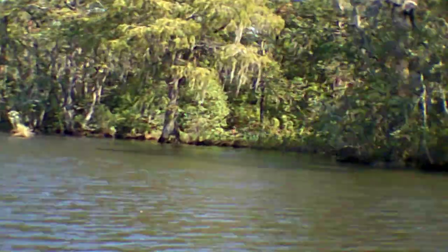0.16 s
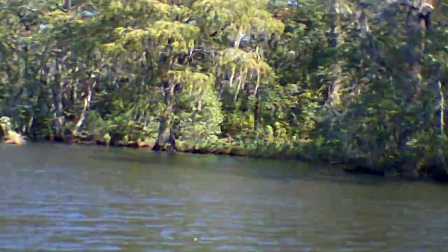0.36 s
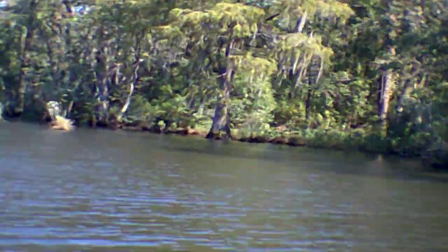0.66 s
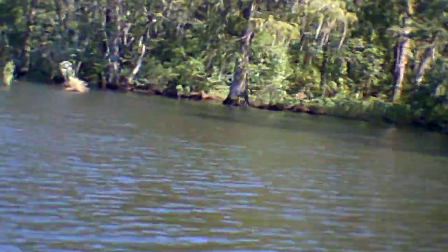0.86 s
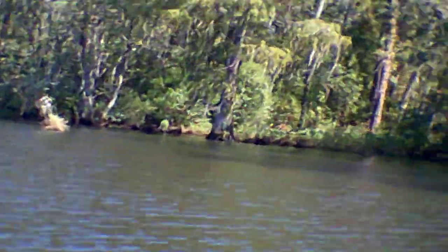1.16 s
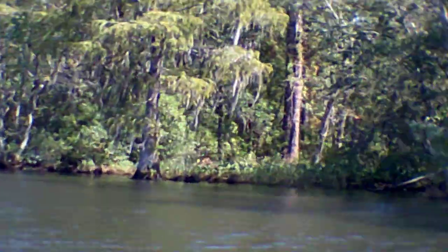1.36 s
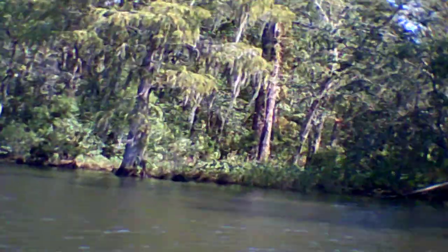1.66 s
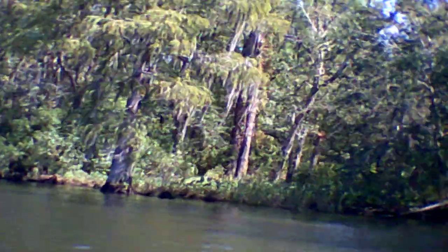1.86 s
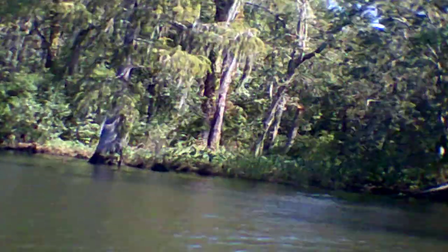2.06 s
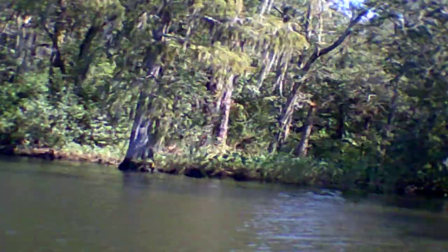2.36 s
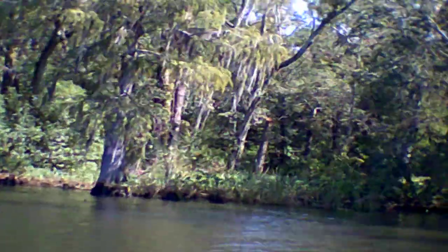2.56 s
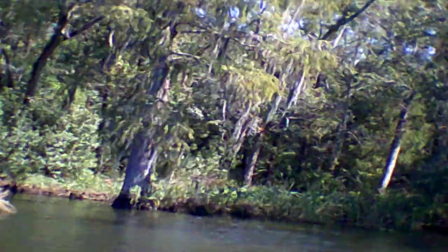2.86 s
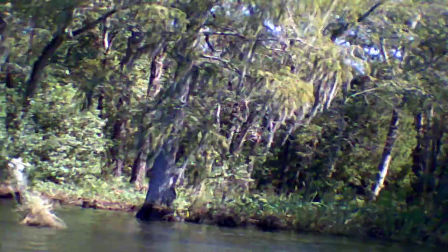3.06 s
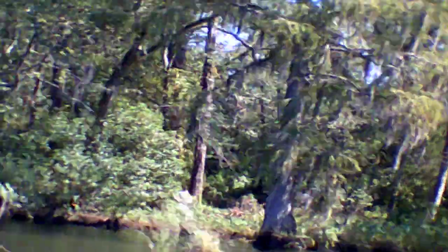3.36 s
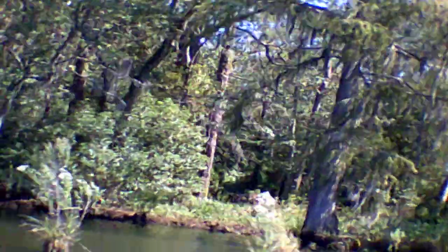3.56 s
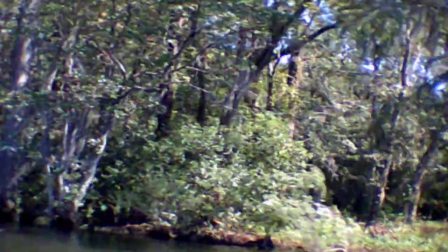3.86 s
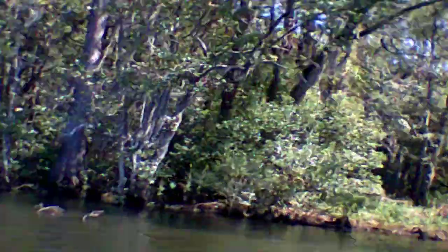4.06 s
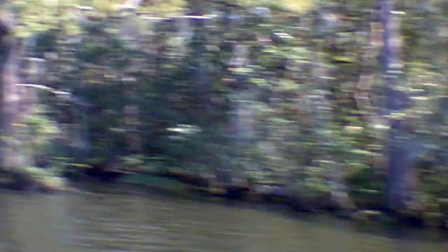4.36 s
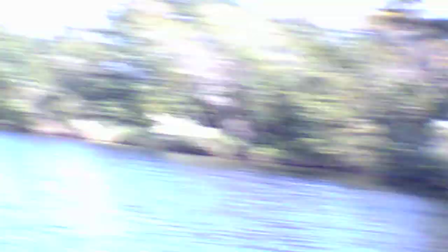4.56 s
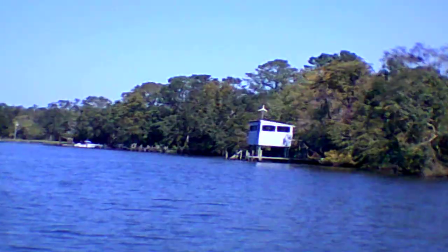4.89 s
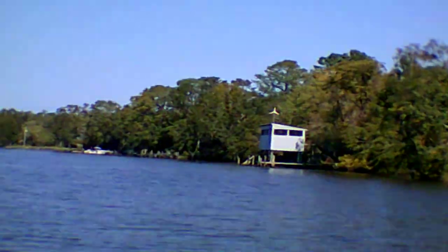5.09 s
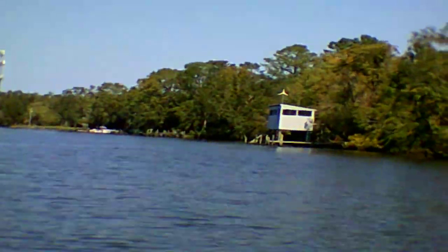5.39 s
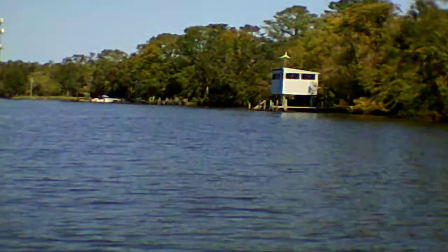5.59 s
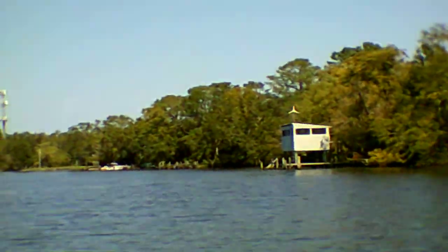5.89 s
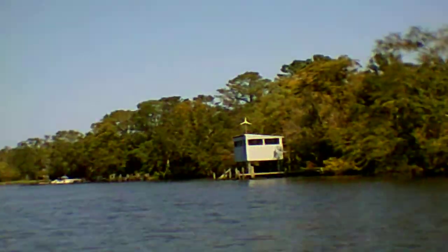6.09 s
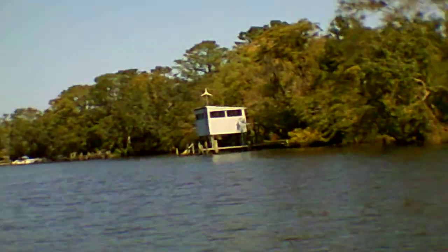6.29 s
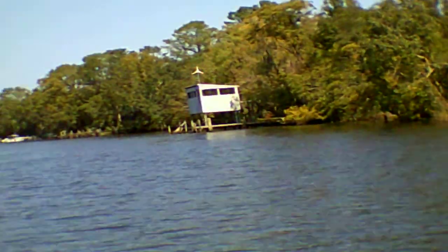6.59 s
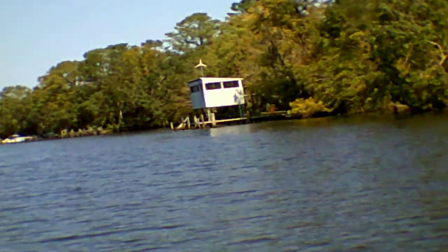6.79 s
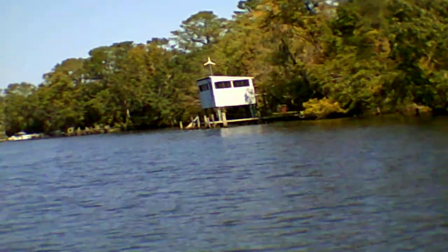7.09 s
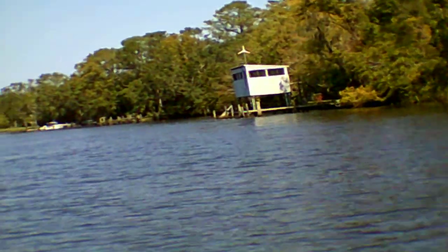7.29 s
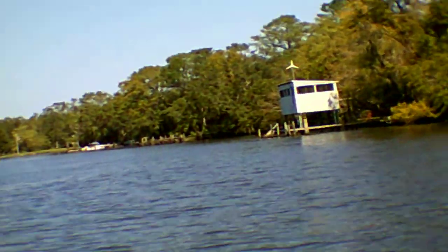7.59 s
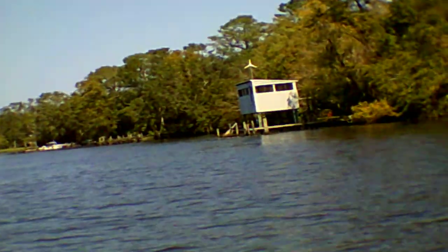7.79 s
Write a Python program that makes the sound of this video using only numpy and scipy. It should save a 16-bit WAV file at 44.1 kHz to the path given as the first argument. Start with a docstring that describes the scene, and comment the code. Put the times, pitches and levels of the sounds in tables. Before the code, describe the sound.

Outdoors on a river, a two-cylinder two-stroke watercraft engine runs very close to a single overloaded microphone, so the sound is dense, flat and harshly distorted throughout. It starts at a medium buzzing drone, around 150 firings a second, with nasal bark, wet gurgle and faint spray hiss. At 0.5 s it sags, reaching a low growl near 0.65, then surges to a high, full rev from 1.2 to 1.65 s and falls to a stumbling low by 2.05. Tiny bright water slaps strike at 1.5 and 2.1 s. From 2.3 to 5.1 it hovers at medium revs, dipping briefly near 2.9 and 3.55, while low wind thumps swell unevenly. It drops at 5.3, surges high around 5.9-6.2, falls at 6.5, then resumes the medium drone, dipping at 7.2 and continuing until the end near 8 s.

```python
"""A two-cylinder two-stroke watercraft engine beside the microphone, its speed following the throttle.
From the start shaft orders hum through the hull, firings bark, wet gas gurgles, spray hisses and wind buffets.
The revs dip, surge by 1.3 s and fall by 2 s; bright water slaps the hull at 1.5 and 2.1 s.
The speed then hovers near 75 turns a second, dips and surges again at 5.3-6.2 s, falls and steadies with dips.
Coloured noise, cosines and resonated pulses make the sources; their sum is clipped hard throughout."""
import sys
import numpy as np
from scipy.fft import rfft, irfft, next_fast_len
from scipy.io import wavfile
from scipy.ndimage import uniform_filter1d, map_coordinates

SR = 44100
rng = np.random.default_rng(int(sys.argv[2]) if len(sys.argv) > 2 else 0)


def unload_wav(signal):
    """Save mono or channel-first audio to the path in sys.argv[1] as 16-bit WAV at rate SR, clipped to [-1, 1]."""
    wavfile.write(
        sys.argv[1],
        SR,
        np.round(np.clip(np.atleast_2d(signal).T, -1, 1) * 32767).astype(np.int16),
    )


N = 350154


def amp(db):
    """Decibel law: amplitude ratio of a level in dB."""
    return 10 ** (np.asarray(db) / 20)


def unit(x):
    """Normalisation to an rms of 1."""
    return x / np.sqrt(np.mean(x ** 2) + 1e-20)


def curves(rows):
    """Linear interpolation in time: one value per sample for each column after the time."""
    s, *columns = np.transpose(rows)
    return [np.interp(np.arange(N) / SR, s, column) for column in columns]


def wobble(rate):
    """Band-limited random modulation: a smooth curve through `rate` random knots a second."""
    knots = rng.standard_normal(int(N * rate / SR) + 4)
    return map_coordinates(knots, [np.arange(N) * rate / SR])


def along(points, hz, closed=True):
    """Gain interpolated in dB on a log frequency axis; above the last point -120 dB if closed, else held."""
    f, db = np.transpose(points)
    above_db = -120 if closed else db[-1]
    return amp(np.interp(np.log(hz + 1), np.log(f + 1), db, db[0], above_db))


def filtered(x, response):
    """Linear filtering: the spectrum of x times a complex response of frequency."""
    m = next_fast_len(N + SR // 2)
    hz = np.fft.rfftfreq(m, 1 / SR)
    return irfft(rfft(x, m) * response(hz), m)[..., :N]


def noise(spectrum):
    """Spectral shaping of white noise, at rms 1."""
    return unit(filtered(rng.standard_normal(N), lambda hz: along(spectrum, hz)))


COAST_HZ_PER_S = 70  # rate of speed change that counts as fully coasting or pulling
COAST_DB = -7  # change of the bark and of orders above the third at full coasting


def throttle(shaft_hz):
    """Angular acceleration: -1 coasting down, 0 at steady speed, 1 pulling up."""
    hz_per_s = uniform_filter1d(np.gradient(shaft_hz) * SR, size=SR // 20)
    return np.clip(hz_per_s / COAST_HZ_PER_S, -1, 1)


def coasting_db(pull):
    """Load dependence of the exhaust note: it weakens as the engine coasts."""
    return COAST_DB * np.maximum(-pull, 0)


# Strength of each shaft order against speed: (shaft speed [Hz], levels of orders 1 to 8 [dB], eight columns)
ORDER_LEVELS = [(50.3, -16.5, -14.5, -22, -11, -18, -17, -21.5, -21.5),
                (56.7, -17, -14.5, -12, -13, -21.5, -18, -29.5, -25),
                (63.3, -16, -14, -11.5, -22.5, -28, -22, -31, -11),
                (69.45, -19, -13, -9, -18, -20.5, -17.5, -33, -18),
                (75.38, -28, -7, -18.5, -15, -18.5, -28.5, -20, -34),
                (87.6, -18, -8.5, -13, -19, -18, -10.5, -26, -19),
                (95, -19, -9, -11.5, -15.5, -27, -19.5, -13.5, -30),
                (107.6, -12.5, -7.5, -16.5, -12, -21, -21.5, -30.5, -26)]
# Transmission of the hum through the hull: (frequency [Hz], gain [dB])
HULL_GAIN = [(50, -2.5), (105, 4.5), (150, 2), (220, 2.5), (300, 4.5), (375, 5), (440, 2.5), (530, -1),
             (650, -2), (900, -7.5)]
# Slow lift of the fourth order: (time [s], gain [dB])
FOURTH_LIFT = [(0, 2.5), (1.3, -1), (2.5, 0), (4.5, 1), (5.6, -1.5), (6.1, -0.5), (6.8, 0.5), (7.2, 0),
               (7.5, 2), (7.94, 4.5)]
FIRING, THIRD, FOURTH = 2, 3, 4  # shaft orders; two firings a turn
TRAIL_TURNS = 0.01089  # phase lag of an order, in its own cycles, per order squared
ODD_DRIFT_TURNS = 0.1977  # slow slip of the odd orders against the firing, in their own cycles
STUMBLE_TURNS = 0.03  # crank unsteadiness at full coasting
THIRD_GAIN_DB = 12  # third order per unit of imbalance
FLUTTER_DB, STUMBLE_DB = 0.66, 4  # level drift of each order, and its increase at full coasting


def hum(turns, shaft_hz, imbalance, firing_db, pull):
    """Harmonic synthesis: cosines at multiples of the shaft speed, lagging as the square of their order."""
    speed, *levels_db = np.transpose(ORDER_LEVELS)
    lift_db, = curves(FOURTH_LIFT)
    coast = np.maximum(-pull, 0)
    flutter_db = FLUTTER_DB + STUMBLE_DB * coast
    stumble = STUMBLE_TURNS * coast * wobble(25)
    tones = 0
    for order, order_db in enumerate(levels_db, 1):
        jitter = 0.0088 * wobble(5) + 0.0066 * wobble(45) + stumble
        phase = order * (turns + jitter) - TRAIL_TURNS * order ** 2
        if order % FIRING:
            phase = phase + ODD_DRIFT_TURNS * wobble(2.5)

        level_db = np.interp(shaft_hz, speed, order_db)
        if order == FIRING:
            level_db = level_db + firing_db
        elif order == THIRD:
            level_db = level_db + THIRD_GAIN_DB * (imbalance - 0.3)
        elif order > THIRD:
            level_db = level_db + coasting_db(pull)
        if order == FOURTH:
            level_db = level_db + lift_db
        level_db = level_db + flutter_db * wobble(14) + wobble(30)

        level = np.sqrt(2) * amp(level_db) * along(HULL_GAIN, order * shaft_hz)
        tones = tones + level * np.cos(2 * np.pi * phase)
    return tones


# Exhaust pipe resonances: (centre frequency [Hz], bandwidth [Hz], gain [dB])
PIPE_MODES = [(525.5, 63, 7), (773, 470, -1.5), (1070, 430, -13), (1880, 110, -18.5)]
# Bark against engine speed: (shaft speed [Hz], level [dB])
BARK_LEVEL = [(48, -32.5), (65, -27.5), (75, -22.5), (108, -22)]


def pipe(f):
    """Modal superposition: resonances of alternating sign, between a bass and a treble roll-off."""
    modes = 0
    for k, (centre, width, db) in enumerate(PIPE_MODES):
        resonance = 1j * f * width / (centre ** 2 - f ** 2 + 1j * f * width)
        modes = modes + (-1) ** k * amp(db) * resonance
    bass_cut = f ** 2 / (f ** 2 + 500 ** 2)
    return modes * bass_cut / (1 + (f / 2800) ** 4)


def bark(turns, shaft_hz, imbalance, pull):
    """Impulse excitation of a resonator: two firings a turn, the second weaker and later with imbalance."""
    count = int(2 * turns[-1])
    scatter_turns, scatter_db = (rng.standard_normal((count, 2)) * [0.011, 2.5]).T
    slot = np.arange(count) / 2  # firing angle in turns
    second = np.arange(count) % 2 * np.clip(np.interp(slot, turns, imbalance), 0, 1)
    angle = slot + 0.1645 + 0.11 * second + scatter_turns
    at = np.interp(angle, turns, np.arange(N)).astype(int)
    blows = np.bincount(at, amp(-8 * second + scatter_db), N)
    level = amp(coasting_db(pull)) * along(BARK_LEVEL, shaft_hz, closed=False)
    return level * unit(filtered(blows, pipe))


# Spectrum of gas in the cooling water: (frequency [Hz], density level [dB])
GURGLE_SPECTRUM = [(40, -16.5), (100, 2), (220, 4.5), (500, -4), (1000, -9.5), (2000, -38.5), (3000, -36),
                   (5000, -85), (7900, -48.5), (8700, -83.5)]
# Gurgle against engine speed: (shaft speed [Hz], level [dB])
GURGLE_LEVEL = [(48, -14), (63, -11), (75, -14.5), (108, -14)]


def gurgle(turns, shaft_hz):
    """Amplitude modulation: gas tearing through the cooling water is noise puffed once a firing."""
    puff = 1 + 0.21 * np.cos(2 * np.pi * FIRING * turns + 1.33)
    lumps = amp(1.2 * wobble(25))
    return along(GURGLE_LEVEL, shaft_hz, closed=False) * unit(puff * lumps * noise(GURGLE_SPECTRUM))


# Spectrum of the jet's spray: (frequency [Hz], density level [dB])
SPRAY_SPECTRUM = [(300, -71.5), (700, -31.5), (1300, 3), (2200, -0.5), (2600, -14), (4000, -24),
                  (6000, -32.5), (7900, -24), (8700, -60)]


def spray(shaft_hz):
    """Flow noise as a power law of speed: the jet's hiss gains 5.9 dB per doubling."""
    return amp(-26.5 + 5.9 * np.log2(shaft_hz / 75)) * noise(SPRAY_SPECTRUM)


# Engine speed: (time [s], shaft speed [Hz])
SHAFT_SPEED = [(0.0, 74.5), (0.42, 75.87), (0.49, 69.8), (0.62, 50.26), (0.66, 46.97), (0.82, 63.23),
               (0.97, 81.45), (1.08, 95.36), (1.22, 107.5), (1.3, 109.7), (1.64, 107.5), (1.72, 98.72),
               (1.85, 70.62), (1.94, 56.82), (2.05, 52.48), (2.12, 59), (2.28, 70.83), (2.34, 75.96),
               (2.45, 77.9), (2.5, 75.2), (2.7, 76.1), (2.9, 68.14), (3.03, 75.1), (3.25, 77.2),
               (3.36, 75.62), (3.54, 66.7), (3.67, 74.23), (3.89, 74.7), (4.02, 73.95), (4.14, 72.4),
               (4.29, 76.2), (4.33, 74.07), (4.64, 75.96), (4.75, 74.8), (4.8, 71.33), (5.02, 76.7),
               (5.08, 76.17), (5.15, 69.3), (5.29, 48.28), (5.48, 67.67), (5.79, 102.8), (5.93, 109.2),
               (6.19, 108.7), (6.37, 72), (6.5, 55.82), (6.74, 75.66), (6.88, 77.37), (7.01, 75.54),
               (7.21, 62.33), (7.43, 75.16), (7.61, 74.3), (7.74, 75.44), (7.94, 72.9)]
# Engine loading: (time [s], gain of hum, bark and gurgle [dB], cylinder imbalance [0-1], firing order gain [dB])
ENGINE_LOAD = [(0.0, 1.5, 0, 2), (0.44, -1, 0.1, 1.5), (0.57, -3, 0.6, 0.5), (0.66, 1, 0.6, 2),
               (0.79, 1.5, .4, 3), (0.97, 5.5, .3, -1), (1.37, 1.5, .3, 0), (1.64, 6.5, .3, -2),
               (1.69, 6, 0, -10.5), (1.76, 3.5, 0, 1), (1.87, 3, 0.1, -8), (2.03, 2, 0.5, -3),
               (2.32, 3, .4, 0.5), (2.6, 2.5, .3, 0), (2.81, 4, 0.2, -0.5), (3.1, 1, 0, 2.5),
               (3.5, 2.5, .3, 1), (3.7, 3.5, 0, 2), (4.1, 3.5, .5, -1), (4.3, 3.5, .2, 2),
               (4.69, 4, .2, -0.5), (5.05, 3, 0.2, 0.5), (5.22, -1.5, .4, -4), (5.32, 1.5, .3, 3),
               (5.45, 3.5, 0.23, 0), (6.19, 5, .4, 0.5), (6.27, 5, 0.4, -5.5), (6.43, 3.5, 0, -2.5),
               (6.81, 5, 0.6, -3), (7.08, 3.5, 0, -1), (7.4, 3.5, 0.71, -2), (7.7, 2.5, 0.7, -3),
               (7.94, 2.5, .3, -1.5)]


def engine():
    """Phase coherence: hum, bark and gurgle share one crank angle, the integral of shaft speed."""
    shaft_hz, = curves(SHAFT_SPEED)
    loud_db, imbalance, firing_db = curves(ENGINE_LOAD)
    turns = np.cumsum(shaft_hz) / SR
    pull = throttle(shaft_hz)
    body = hum(turns, shaft_hz, imbalance, firing_db, pull)
    body = body + bark(turns, shaft_hz, imbalance, pull)
    body = body + gurgle(turns, shaft_hz)
    return amp(loud_db) * body + spray(shaft_hz)


# Strength of the buffeting: (time [s], level [dB])
BUFFET_LEVEL = [(0.0, -15.5), (0.25, -14), (0.55, -15.5), (0.7, -8.5), (0.8, -18.5), (1.15, -23),
                (1.41, -2), (1.6, -4), (1.85, -3.5), (2.1, -0.5), (2.3, -14), (2.55, -6), (3.0, -7.5),
                (3.25, -18.5), (3.45, -1.5), (3.9, -6), (4.2, -3.5), (4.45, -4), (4.9, -13), (5.28, -12.5),
                (5.5, -17), (5.95, -19), (6.4, -3), (6.75, -19), (7.1, -7.5), (7.45, -29.5), (7.61, -15),
                (7.94, -23)]
# Spectrum of the buffeting: (frequency [Hz], density level [dB])
BUFFET_SPECTRUM = [(8, 1), (25, 4), (60, 1.5), (110, -4), (250, -41.5), (600, -75)]


def wind():
    """Turbulent pressure fluctuation: lumpy low noise at the microphone port."""
    buffet_db, = curves(BUFFET_LEVEL)
    lumps = amp(1.2 * wobble(14) + 3.5 * wobble(8))
    return amp(buffet_db) * unit(lumps * noise(BUFFET_SPECTRUM))


# Water striking the hull: (time [s], onset level [dB], 60 dB decay time [s])
SLAP_TIMES = [(1.509, -1.5, 0.035), (2.104, -6.5, 0.048)]
# Spectrum of a slap: (frequency [Hz], density level [dB])
SLAP_SPECTRUM = [(100, -54.5), (300, -14), (1200, -2.5), (1750, 11), (2400, -14), (4500, -23.5),
                 (8000, -17), (9500, -48), (15000, -42)]


def slaps():
    """Exponential decay: each bright splash is noise with a sudden onset and a short reverberation-like fall."""
    t = np.arange(N) / SR
    envelope = 0
    for start, db, t60 in SLAP_TIMES:
        decay = amp(db - 60 * np.abs(t - start) / t60)
        envelope = envelope + decay * (t > start)
    return envelope * noise(SLAP_SPECTRUM)


def scene():
    """Linear superposition of engine, wind and slaps in one channel."""
    return (engine() + wind() + slaps())[None]


# Treble shelf after the rails: (frequency [Hz], gain [dB])
TREBLE_SHELF = [(7800, 0), (8400, -5), (9100, -11), (11000, -10), (16000, -6)]
RAIL = 0.71  # clipping amplitude, full scale 1
TOP_HZ = 15750  # upper band limit


def record(dry):
    """Saturation: the microphone fades above 8 kHz and the off-centre input stage clips flat at its rails."""
    heard = filtered(dry, lambda hz: 1 / np.sqrt(1 + (hz / 8300) ** 16))
    flat = np.clip(heard + 0.05, -RAIL, RAIL)
    return filtered(flat, lambda hz: (hz < TOP_HZ) * along(TREBLE_SHELF, hz))


dry = scene()
out = record(dry)
unload_wav(out)
```